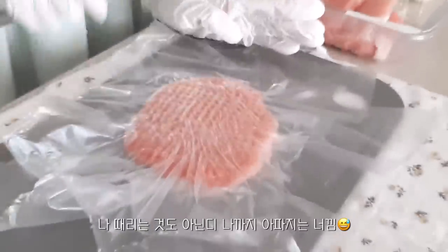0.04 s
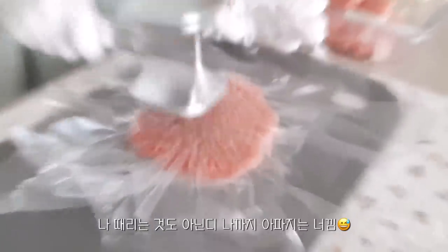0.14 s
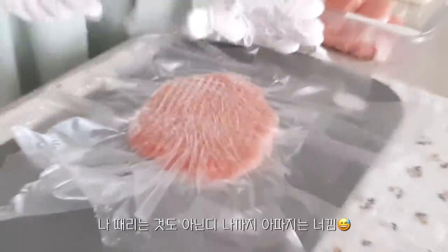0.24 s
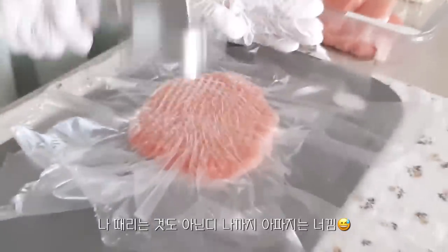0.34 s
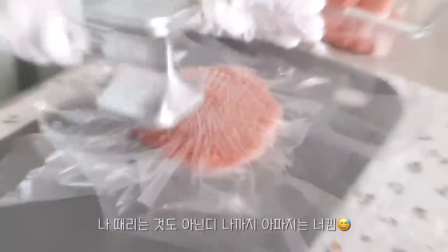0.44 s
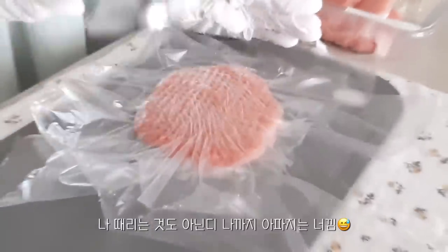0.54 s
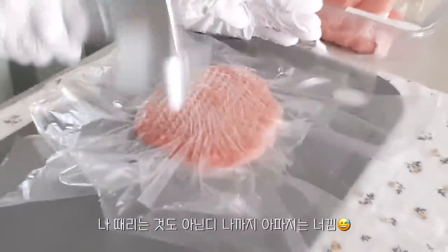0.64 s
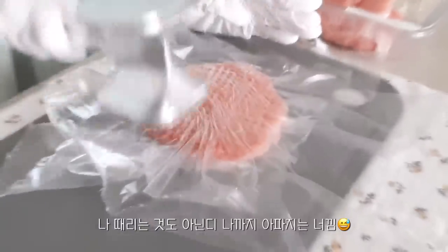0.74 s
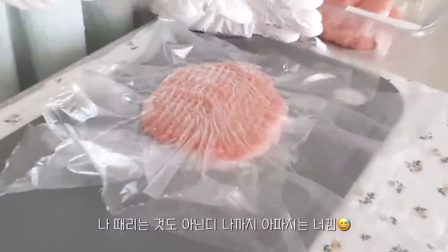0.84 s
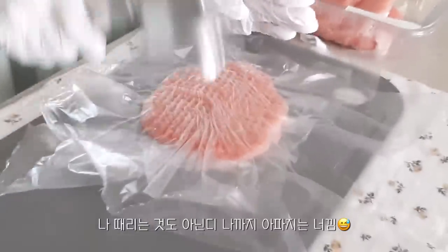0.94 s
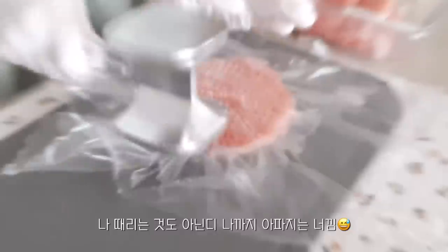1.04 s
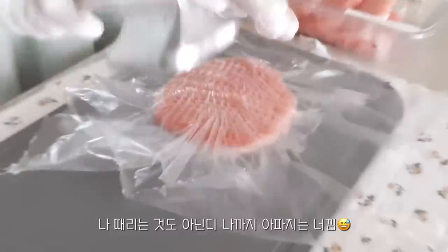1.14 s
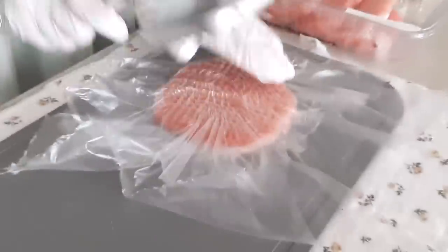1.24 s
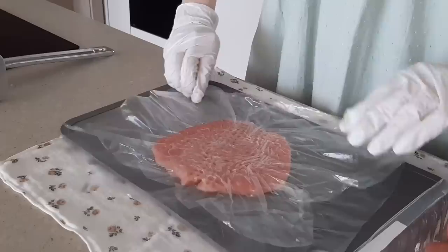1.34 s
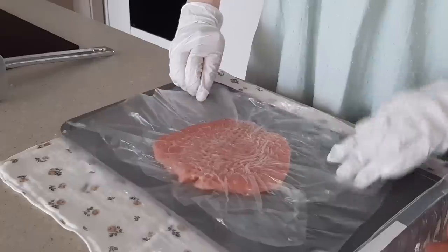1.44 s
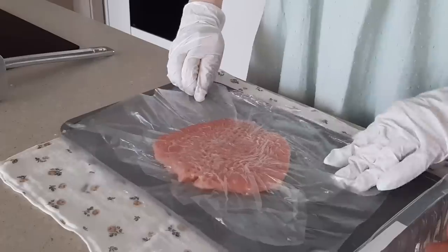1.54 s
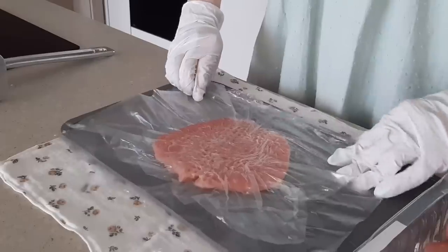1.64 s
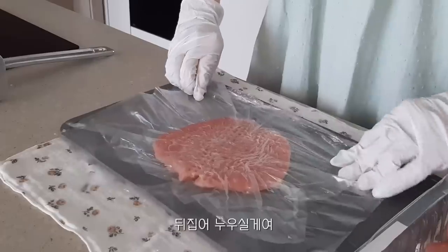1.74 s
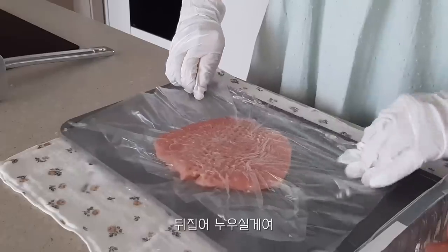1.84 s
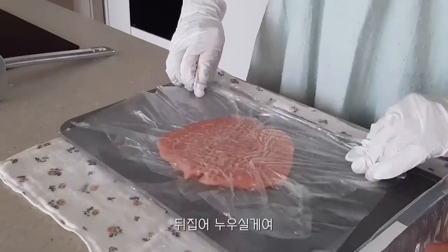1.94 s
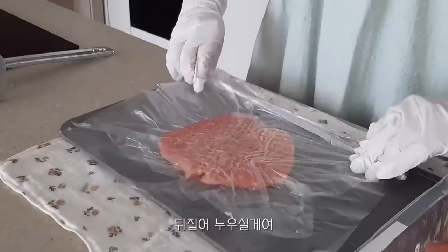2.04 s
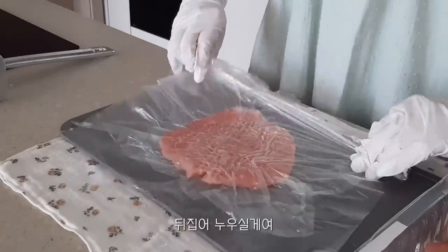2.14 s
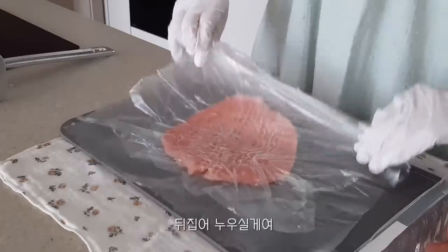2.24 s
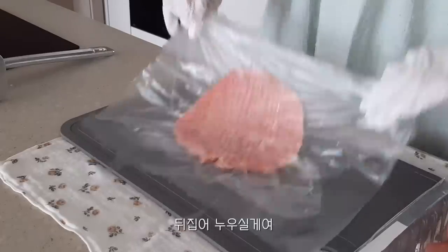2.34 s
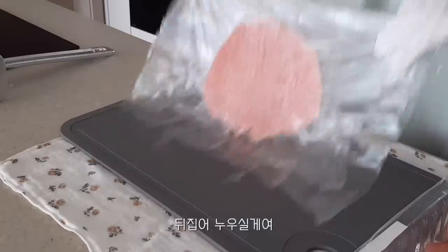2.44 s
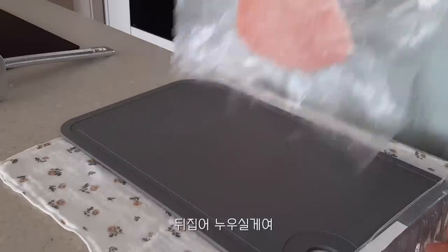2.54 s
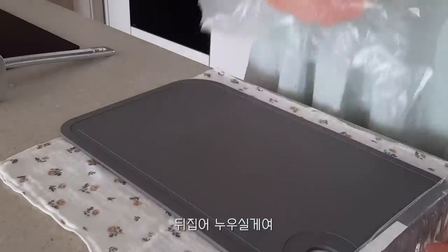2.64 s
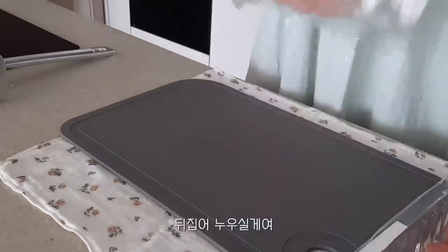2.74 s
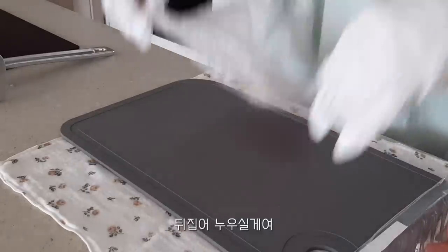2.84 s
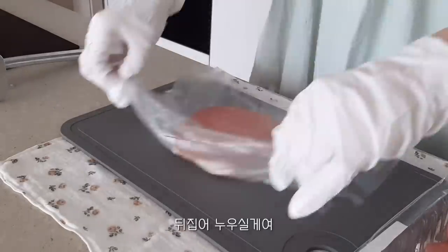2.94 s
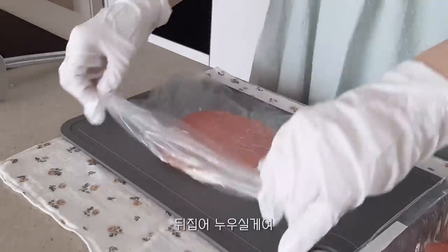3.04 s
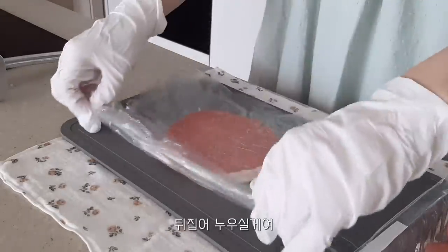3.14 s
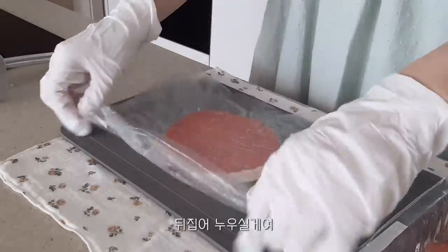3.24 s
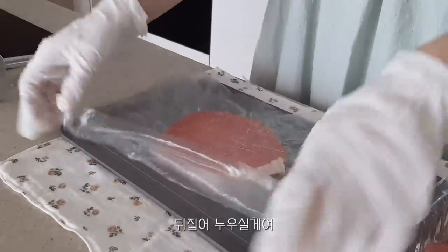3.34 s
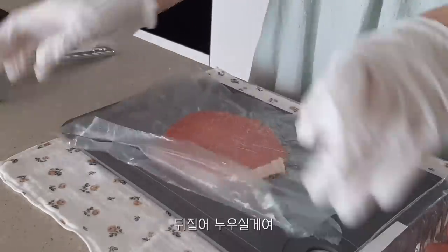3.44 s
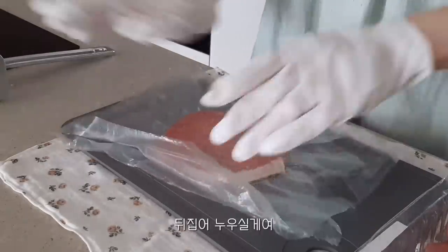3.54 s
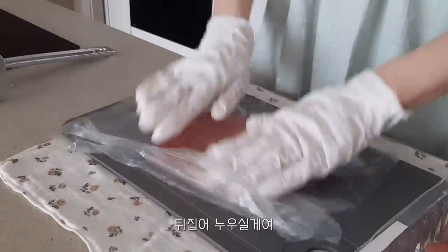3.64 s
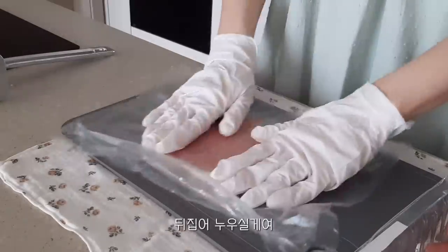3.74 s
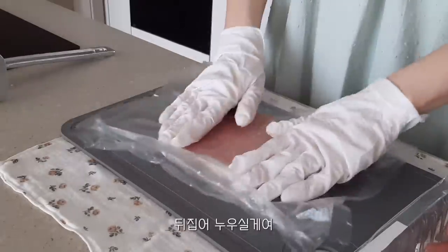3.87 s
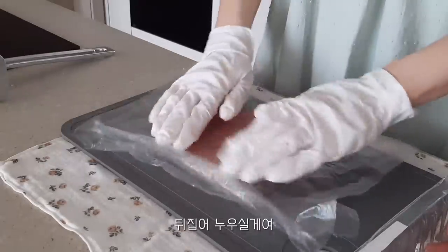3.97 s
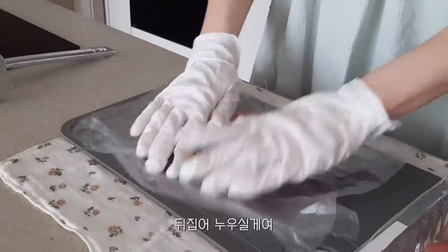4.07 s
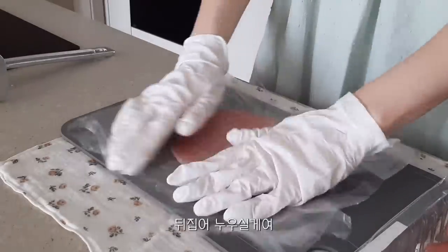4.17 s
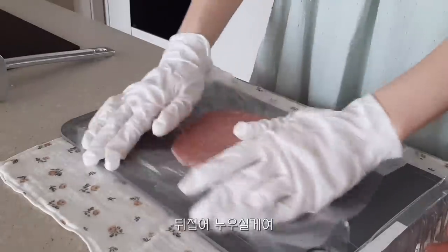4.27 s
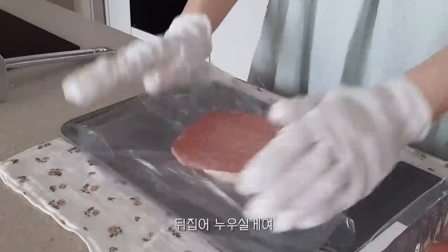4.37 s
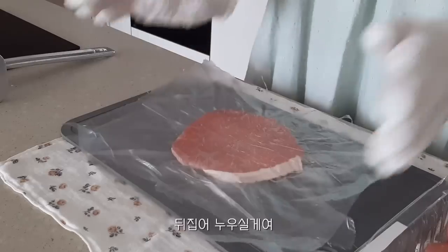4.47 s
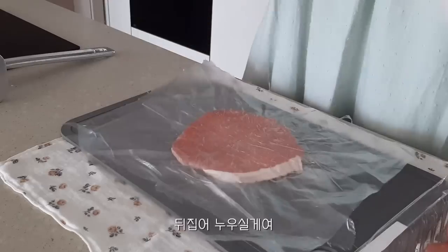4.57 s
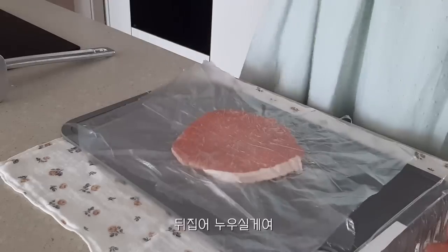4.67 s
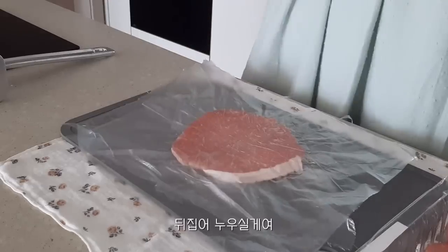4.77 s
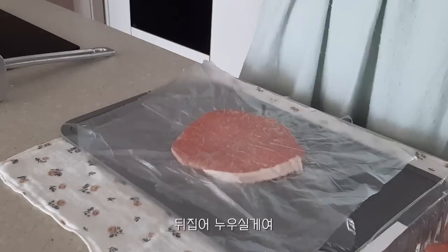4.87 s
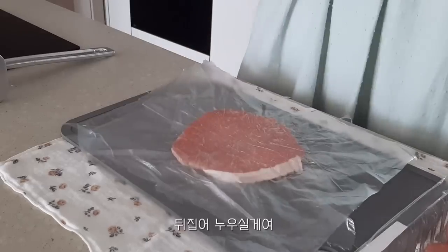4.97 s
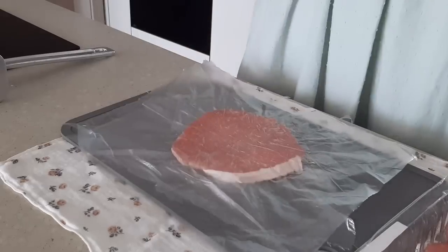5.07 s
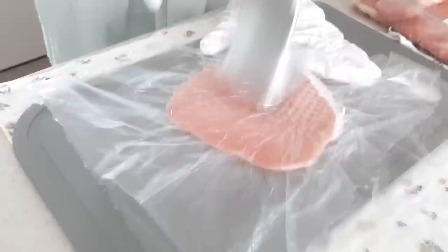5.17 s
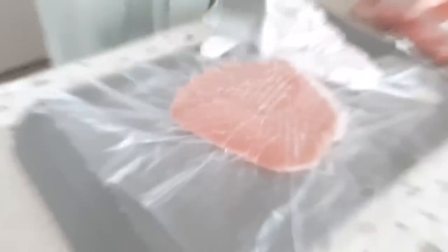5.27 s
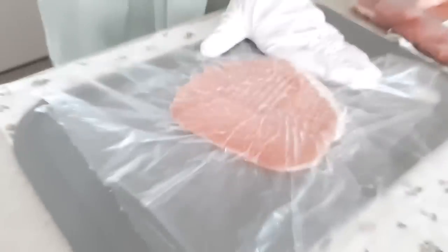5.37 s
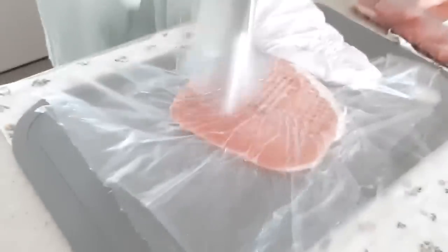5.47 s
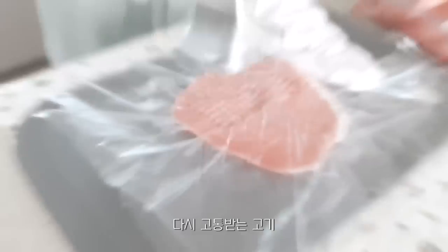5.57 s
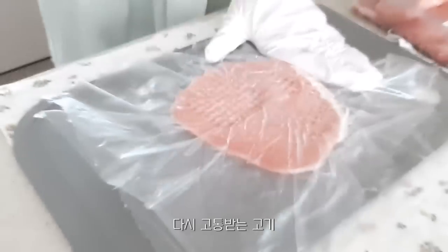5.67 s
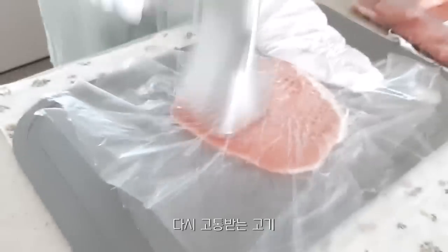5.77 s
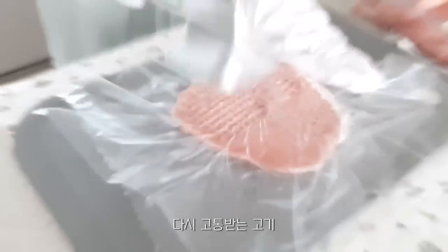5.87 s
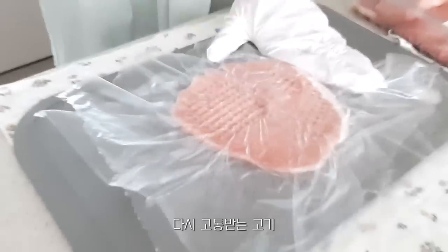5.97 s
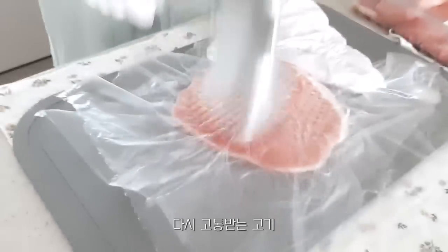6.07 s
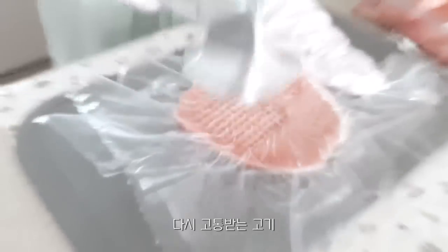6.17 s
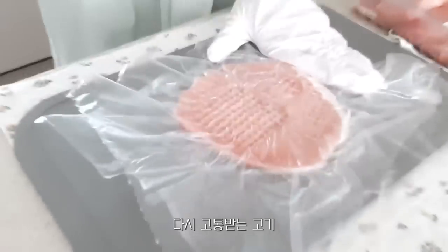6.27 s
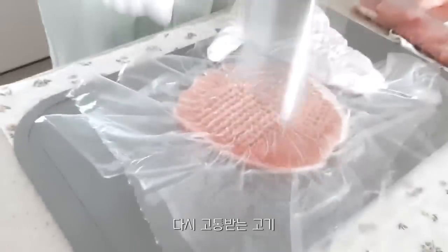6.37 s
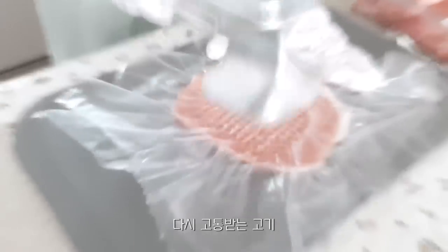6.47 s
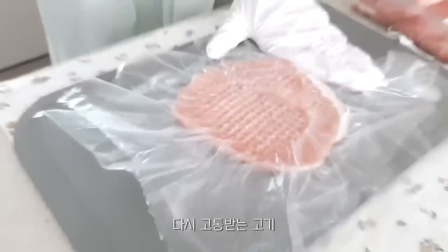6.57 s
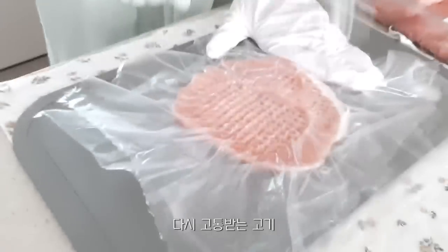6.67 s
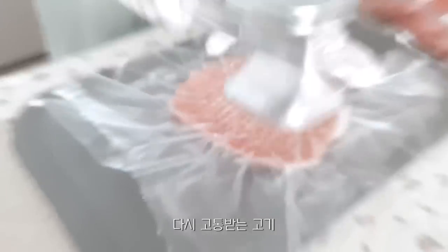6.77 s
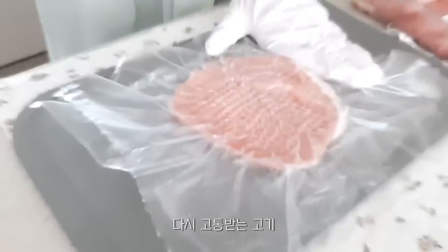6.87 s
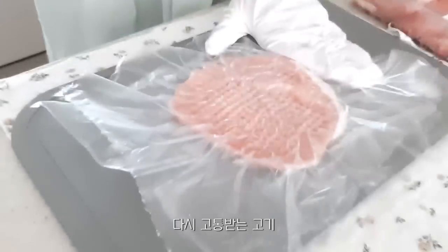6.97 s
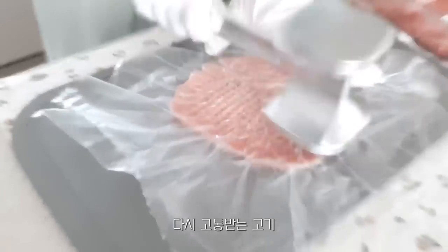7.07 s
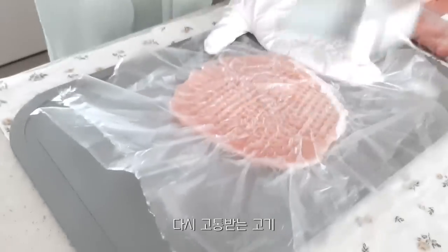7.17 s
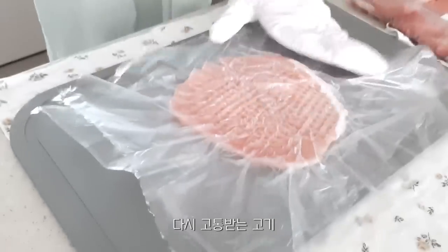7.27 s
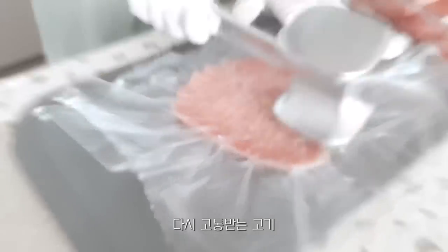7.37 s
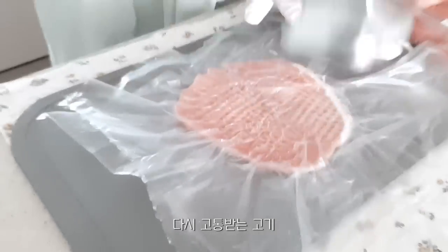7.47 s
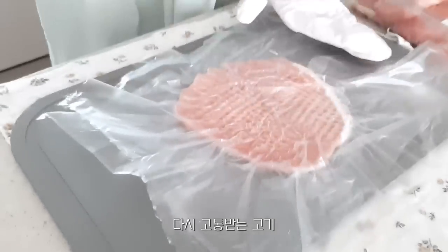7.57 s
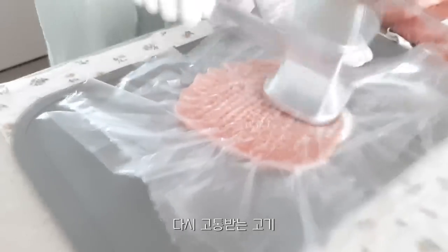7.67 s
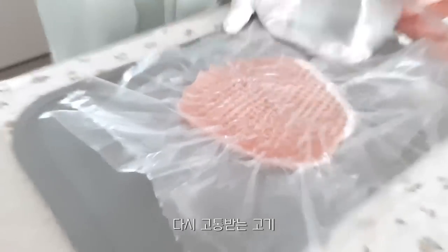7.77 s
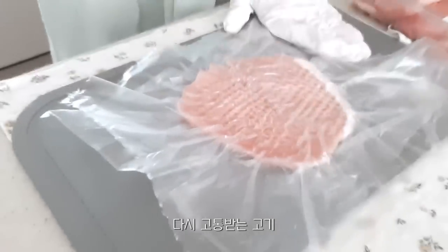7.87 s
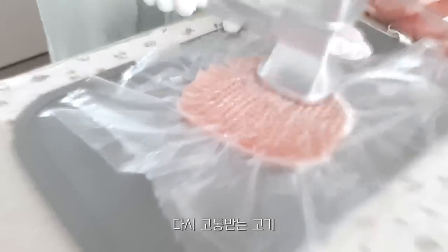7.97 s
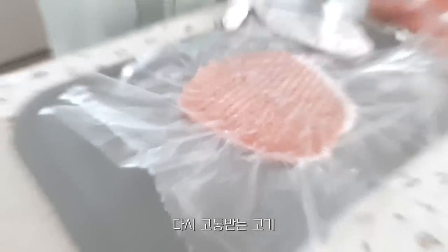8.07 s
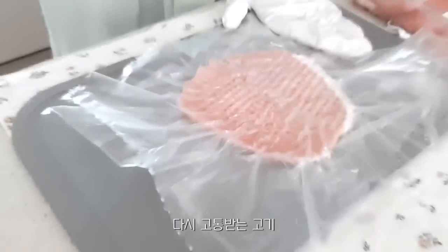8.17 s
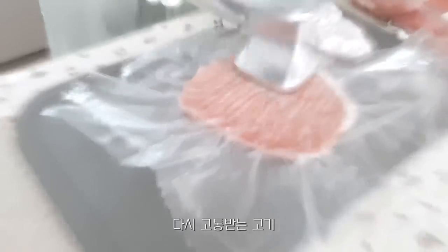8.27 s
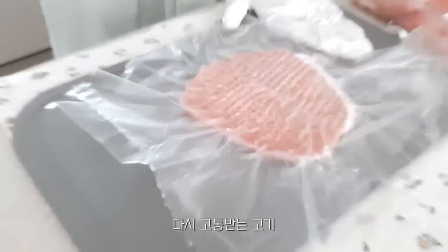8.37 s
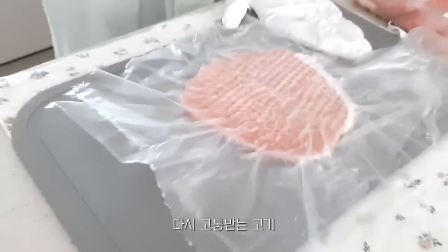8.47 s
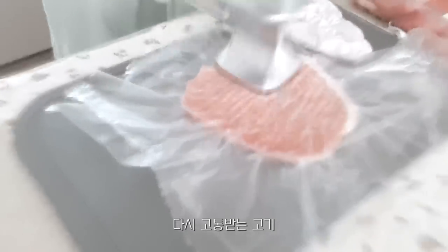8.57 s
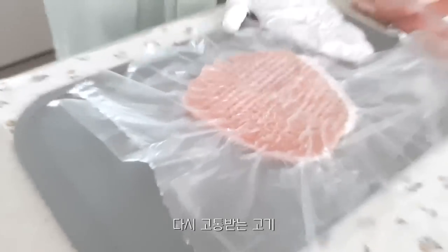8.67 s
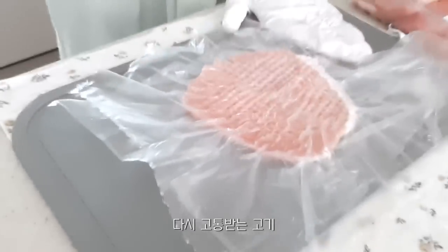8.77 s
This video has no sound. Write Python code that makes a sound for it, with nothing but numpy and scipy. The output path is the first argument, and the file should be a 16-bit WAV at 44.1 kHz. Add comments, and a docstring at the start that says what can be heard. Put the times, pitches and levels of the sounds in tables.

```python
"""At a kitchen table, close reverberation and a faint appliance hum around a board slightly to the right.
The room still booms as a metal mallet pounds a pork cutlet through thin plastic film: four blows, each a film
slap, a thud through meat and board and a boom of table and room. Gloved hands tug the film, lift the cutlet,
flop it over and pat it smooth; film crackles faintly. Twelve more blows come later, the first partly hidden
by a brief dropout, the last with board clacks. Noise and clicks make film and knocks; modes ring the boom."""
import sys
import numpy as np
from scipy import signal
from scipy.fft import rfft, irfft, next_fast_len
from scipy.io import wavfile
from scipy.ndimage import uniform_filter1d

SR = 44100
rng = np.random.default_rng(int(sys.argv[2]) if len(sys.argv) > 2 else 0)


def pcm_store(signal):
    """Save signal as 16-bit PCM."""
    levels = np.round(np.clip(np.atleast_2d(signal), -1, 1) * 32767)
    wavfile.write(sys.argv[1], SR, levels.astype(np.int16).T)


N = 388521
TIME = np.arange(N) / SR


def from_db(db):
    """Decibels to amplitude gain."""
    return 10 ** (np.asarray(db) / 20)


def rms_one(x):
    """Scale to unit rms."""
    return x / np.sqrt(np.mean(x ** 2) + 1e-20)


def at_hz(points, hz, column=1):
    """Read one column of a table on a log-frequency axis."""
    table_rows = np.array(points)
    return np.interp(np.log(np.maximum(hz, 1)), np.log(table_rows[:, 0]), table_rows[:, column])


def colour(x, spectrum):
    """Give a steady texture a spectrum, at rms 1 over both channels."""
    size = next_fast_len(N)
    hz = np.arange(size // 2 + 1) * SR / size
    shaped = irfft(rfft(x, size) * from_db(at_hz(spectrum, hz)), size)
    return rms_one(shaped[..., :N])


def drift(rate_hz):
    """Slow chance: straight lines between random knots with a spread of 1."""
    knots = rng.standard_normal(N // 10)
    return np.interp(TIME * rate_hz, np.arange(N // 10), knots)


def two_ports(draws, likeness):
    """Mix two unrelated textures into a left and right whose correlation is likeness."""
    c = np.clip(likeness, 0, 1)
    shared = np.sqrt(1 + c) * draws[0]
    opposed = np.sqrt(1 - c) * draws[1] * [[1], [-1]]
    return (shared + opposed) / np.sqrt(2)


def noise(likeness):
    """Hiss in two partly alike channels."""
    return two_ports(rng.standard_normal((2, N)), likeness)


def grains(per_s, spread_db):
    """Two streams of tiny buckling clicks of uneven size; drifting odds make them come in clumps."""
    born = rng.random((2, N)) < per_s * from_db(4 * drift(90)) / SR
    size = from_db(spread_db * np.minimum(rng.exponential(1, (2, N)), 4))
    return rms_one(born * rng.choice([-1, 1], (2, N)) * size)


def burst(s, rise, fall, hold=0):
    """An envelope that swells to 1 at time s, holds and dies away; rise and fall are time constants [s]."""
    out = np.zeros(N)
    near = slice(max(int((s - .3) * SR), 0), int((s + hold + .3) * SR))
    t = TIME[near] - s
    out[near] = np.exp(np.minimum(t, 0) / rise - np.maximum(t - hold, 0) / fall)
    return out


def swells(rows, rise, fall):
    """Joint envelope of rustles (start [s], held length [s], level [dB]); their powers add."""
    return np.sqrt(sum((from_db(db) * burst(s, rise, fall, hold=length)) ** 2 for s, length, db in rows))


def ring(x, hz, t60):
    """A resonator: a unit click sets a dying sine of starting height 1 ringing, 60 dB down after t60 [s]."""
    r = from_db(-60 / (t60 * SR))
    w = 2 * np.pi * hz / SR
    return signal.lfilter([0, np.sin(w)], [1, -2 * r * np.cos(w), r * r], x + 1e-18)


# spectrum of the still room air: (frequency [Hz], relative level [dB])
ROOM_AIR = [(40, -10), (100, -3.5), (400, -7.5), (620, -15.5), (900, -22), (1600, -18.5), (2600, -20.5),
            (15000, -23)]
# steady tones of the appliance: (frequency [Hz], rms level [dB])
APPLIANCE_HUM = [(102.3, -83), (457.8, -76.5), (612.5, -87.5)]


def background():
    """Still room air as coloured hiss, and the steady sines of an appliance."""
    air = from_db(-72.5) * colour(noise(likeness=0.44), ROOM_AIR)
    hum = sum(from_db(db) * rms_one(np.sin(2 * np.pi * hz * TIME)) for hz, db in APPLIANCE_HUM)
    return air + hum


# reverberation of the kitchen: (frequency [Hz], gain [dB], t60 [s])
KITCHEN_TAIL = [(60, -19, 0.57), (149, -19.5, 0.67), (317, -7, 0.41), (533, 3, 0.47), (1590, 0.5, 0.63),
                (3720, 1, 0.51), (7500, 0, 0.45), (14900, 0, 0.28)]


def kitchen(x, first_wall_s=0.0043, alike_below_hz=500, fixed_below_hz=1300):
    """A diffuse tail dies band by band. Long waves repeat one echo pattern;
    short ones are scattered anew all the time as hands and film move."""
    t = TIME[:int(.8 * SR)]
    response, scattered = 0, 0
    edges = np.geomspace(45, 18000, 18)
    white = rng.standard_normal((2, 2, N))
    arriving = np.interp(TIME - first_wall_s, TIME, x[1])
    for k, (low, high) in enumerate(zip(edges, edges[1:])):
        hz = np.sqrt(low * high)
        sos = signal.butter(2, [low, high], "band", fs=SR, output="sos")
        gain, t60 = from_db(at_hz(KITCHEN_TAIL, hz)), at_hz(KITCHEN_TAIL, hz, column=2)
        # share of the power that repeats one echo pattern
        repeated = 1 / (1 + (hz / fixed_below_hz) ** 2)
        decay = from_db(-60 * t / t60) * (1 - np.exp(-(t / first_wall_s) ** 2))
        likeness = 1 / (1 + (hz / alike_below_hz) ** 4)
        tail = two_ports(rng.standard_normal((2, len(t))), likeness) * decay
        band_level = np.sqrt(repeated * 2 * (high - low) / SR / len(t))
        response = response + gain * rms_one(signal.sosfilt(sos, tail)) * band_level
        if hz > 500:
            # the band's energy leaks away; fresh noise carries it
            keep = from_db(-120 / (t60 * SR))
            power = signal.sosfilt(sos, arriving + 1e-9 * white[0, 0]) ** 2
            energy = signal.lfilter([1 - keep], [1, -keep], power)
            carrier = rms_one(signal.sosfilt(sos, white[k % 2]))
            scattered = scattered + gain * np.sqrt((1 - repeated) * energy) * carrier
    echoing = signal.fftconvolve(x, response, axes=1)[:, :N]
    return echoing + scattered * from_db([[-1.8], [-.5]])


# faint crackles of the film: (start [s], held length [s], level [dB])
FILM_CRACKLES = [(3.49, 0.11, -63), (4.70, 0.032, -55.5), (4.81, 0.027, -54), (4.99, 0.12, -56),
                 (5.44, 0.036, -67), (5.65, 0.077, -64.5), (7.285, 0.037, -48.5)]
# spectrum of buckling creases, also heard in the handling and pats: (frequency [Hz], relative level [dB])
CREASE_SPECTRUM = [(400, -12), (1200, -14.5), (2500, -4.5), (4500, -2), (7500, 0.5), (11000, 0),
                   (15500, 2.5)]


def film_crackles():
    """Thin crackle of tiny clicks: film settling after handling, or peeling back as the mallet lifts."""
    envelope = swells(FILM_CRACKLES, rise=0.037, fall=0.023)
    return envelope * colour(two_ports(grains(4000, spread_db=3.0), likeness=0.14), CREASE_SPECTRUM)


# the hands tug, drop or stroke the film: (start [s], held length [s], motion level [dB])
HAND_STROKES = [(1.345, 0.028, -50.5), (1.435, 0.061, -42.5), (1.60, 0.06, -43), (1.75, 0.034, -43.5),
                (1.835, 0.037, -42), (1.945, 0.053, -46), (2.867, 0.027, -33), (2.97, 0.098, -43.5),
                (3.18, .12, -47), (3.37, 0.031, -59), (3.668, .025, -42), (3.75, 0.19, -49.5),
                (4.03, .03, -49), (4.09, 0.025, -41), (4.18, 0.1, -46)]
# the cutlet is dragged off the board and swung over in its film:
# (time [s], relative crinkle level [dB], relative rubbing level [dB])
CUTLET_LIFT = [(2.03, -50.5, -64), (2.252, -52, -63), (2.422, -45.5, -52.5), (2.636, -54, -64),
               (2.728, -46, -54), (2.846, -43.5, -51.5), (2.85, -39.5, -49)]
# single creases snapping over: (time [s], level [dB])
CREASE_SNAPS = [(1.337, -44), (3.032, -44), (3.464, -46.5)]
# spectrum of gloves rubbing on film, also part of the pats' puff: (frequency [Hz], relative level [dB])
RUB_SPECTRUM = [(120, -11), (350, 2), (900, 0), (1600, 5.5), (2500, -2.5), (5000, -2), (12000, -36.5)]


def film_handling(crinkle_db=5.5, rub_db=-11.5, lift_crinkle_db=-0.5, lift_rub_db=2):
    """Creases buckle, faster when the film moves more; gloves and film rub; single folds snap."""
    s, *columns = np.transpose(CUTLET_LIFT)
    swing, drag = [from_db(np.interp(TIME, s, c, left=-120, right=-120)) for c in columns]
    strokes = swells(HAND_STROKES, rise=0.03, fall=.04)
    motion = np.hypot(strokes, from_db(lift_crinkle_db) * swing)
    friction = np.hypot(from_db(rub_db) * strokes, from_db(lift_rub_db) * drag)
    per_s = 8000 * np.sqrt(motion / from_db(-43.0))
    crinkle = colour(two_ports(grains(per_s, spread_db=2.5), likeness=0.1), CREASE_SPECTRUM)
    # even out the grain stream so that the hand's motion sets its loudness
    power = uniform_filter1d(np.mean(crinkle ** 2, axis=0), int(0.06 * SR)).clip(0)
    crinkle = crinkle / np.sqrt(power + 1e-4)
    rub = colour(two_ports(grains(7000, spread_db=-4.0), likeness=0.86), RUB_SPECTRUM)
    snaps = sum(from_db(db) * burst(s, rise=0.00035, fall=0.0011) for s, db in CREASE_SNAPS)
    crack = colour(noise(likeness=0.63), CREASE_SPECTRUM)
    return from_db(crinkle_db) * motion * crinkle + friction * rub + snaps * crack


# modes of board, table and room: (frequency [Hz], relative level [dB], t60 [s])
TABLE_MODES = [(56.9, -32.5, 1), (71.6, -12.5, 0.18), (97, -17.5, 0.37), (126.4, -25.5, 1),
               (139.5, -20, 0.62), (168.1, -15, 0.29), (197.6, -18, 0.41), (249.2, -21, 0.333),
               (280, -20, 0.5), (322.7, -27.5, 0.27), (357.3, -20.5, 0.56), (405, -24, 0.37),
               (460.4, -25, 0.41), (590, -24.5, .45)]


def table(force):
    """The table and the room around it boom in their modes, alternating in sign."""
    modes = enumerate(TABLE_MODES)
    return sum((-1) ** k * from_db(db) * ring(force, hz, t60) for k, (hz, db, t60) in modes)


# early echoes of the thud from walls and ceiling: (delay [s], level relative to the direct thud [dB])
WALL_ECHOES = [(.0075, -17), (0.021, -16.5), (0.023, -7), (.030, -28), (0.039, -14), (.060, -48.5)]


def thud(blows, radiate_hz=35, build_up_s=0.01112, port_lag_s=0.00014):
    """Meat cushions each blow (time [s], force [dB], push half-width [s]); board radiates, table rings."""
    force = sum(from_db(db) * np.maximum(1 - np.abs(TIME - s) / half_width, 0)
                for s, db, half_width in blows)
    # the board is too small to radiate the slow part of the push
    swing = force - .5 * uniform_filter1d(force, int(0.0053 * SR))
    direct = 1.76 * signal.sosfilt(signal.butter(1, radiate_hz, "high", fs=SR, output="sos"), swing)
    echoes = sum(from_db(db) * np.interp(TIME - delay, TIME, direct) for delay, db in WALL_ECHOES)
    board = from_db(-39) * ring(force, 100, 0.043)
    boom = from_db(-35.5) * table(np.interp(TIME - build_up_s, TIME, force))
    sound = direct - board + echoes + boom
    # the right channel hears it slightly later
    return np.array([from_db(-1.2) * sound, from_db(-0.87) * np.interp(TIME - port_lag_s, TIME, sound)])


# cutlet and palms landing on the board: (time [s], thud force [dB], film slap level [dB])
PALM_PATS = [(1.46, -45, -44), (2.86, -37, -18.5), (3.686, -44.5, -39), (4.104, -42.5, -33)]


def pats():
    """The cutlet flops onto the board and soft palms press the film down, driving out a puff of air."""
    slap = sum(from_db(db) * burst(s, rise=0.0011, fall=0.0072) for s, _, db in PALM_PATS)
    hiss = noise(likeness=0.84)
    puff = colour(hiss, CREASE_SPECTRUM) + from_db(-12.5) * colour(hiss, RUB_SPECTRUM)
    soft_pushes = [(s, db, 0.0036) for s, db, _ in PALM_PATS]
    return thud(soft_pushes) + slap * puff


# mallet blows: (time [s], strength [dB], air squeezed from under the film [dB])
MALLET_BLOWS = [(0.096, -12, -27), (0.382, -13.5, -30), (0.677, -17, -31), (0.984, -13, -30.5),
                (5.187, -16, -36), (5.4927, -16.5, -32.5), (5.7899, -15.5, -31.5), (6.0919, -15, -31),
                (6.4, -15, -34), (6.7122, -15.5, -35), (7.0397, -14.5, -35), (7.3615, -14.5, -34.5),
                (7.676, -15.5, -32), (7.9731, -14.5, -33.5), (8.265, -14.5, -33.5), (8.5699, -16, -33)]
# the thick cutlet cushions the first run more than the flattened one does the second:
# (time [s], push half-width [s])
MEAT_CUSHION = [(1.0, 0.0016), (5.2, .0014)]
# the board bounces back on the table after off-centre blows: (time [s], level [dB])
BOARD_CLACKS = [(7.694, -43), (7.989, -27), (8.280, -21.5)]
# spectra of film slap, squeezed air, mallet knock and board clack: (frequency [Hz], relative level [dB])
SLAP_SPECTRUM = [(200, -9), (700, -1.5), (2000, 4.5), (4000, -2.5), (7500, 0), (10000, -4), (15500, -12)]
SIZZLE_SPECTRUM = [(4000, -2), (8000, -48), (10500, -1), (13000, 6.5), (15500, 0)]
KNOCK_SPECTRUM = [(250, 10), (500, 8.5), (750, 2.5), (1050, 1), (1300, -10.5), (1550, 7.5), (1800, -16),
                  (2100, -6.5), (2700, -10.5), (5000, -22), (12000, -33)]
CLACK_SPECTRUM = [(400, -4), (1550, -2.5), (2050, 1), (2600, -38), (12000, -32)]


def mallet(slap_db=0.42, sizzle_db=-1.2, knock_db=-12.8):
    """The face squeezes air out of the film in a swelling slap, then knocks home; harder is louder."""
    half_widths = np.transpose(MEAT_CUSHION)
    pushes = [(s, db, np.interp(s, *half_widths)) for s, db, _ in MALLET_BLOWS]
    squeeze = sum(from_db(air_db) * burst(s - .0015, rise=0.0014, fall=0.0017)
                  for s, _, air_db in MALLET_BLOWS)
    knock = sum(from_db(db) * burst(s - .0005, rise=0.0021, fall=0.0045) for s, db, _ in MALLET_BLOWS)
    bounce = sum(from_db(db) * burst(s, rise=0.0002, fall=0.0014) for s, db in BOARD_CLACKS)
    slap_clicks = two_ports(grains(16000, spread_db=2.5), likeness=0.3)
    film = from_db(slap_db) * squeeze * colour(slap_clicks, SLAP_SPECTRUM)
    air = from_db(sizzle_db) * squeeze * colour(noise(likeness=0.42), SIZZLE_SPECTRUM)
    head = from_db(knock_db) * knock * colour(noise(likeness=0.32), KNOCK_SPECTRUM)
    clack = bounce * colour(noise(likeness=0.79), CLACK_SPECTRUM)
    # work is already under way at the start
    still_booming = from_db(-64.5) * table(burst(0, rise=.001, fall=0.00056))
    return thud(pushes) + film + air + head + clack + still_booming


def scene():
    """The board lies slightly to the right; the rustle sounds drier, with less room tail than the blows."""
    right = from_db([[-.8], [.7]])
    blows = right * (mallet() + pats())
    rustle = right * (film_handling() + film_crackles())
    return blows + rustle + kitchen(blows + from_db(-6) * rustle) + background()


def record(dry, notch_hz=8800, notch_q=6.6, notch_depth=.62, low_cut_hz=43, cutoff_hz=15800):
    """The microphone loses the deepest bass and dips in the treble; the sound drops out briefly; top cut."""
    thin = signal.sosfilt(signal.butter(6, low_cut_hz, "high", fs=SR, output="sos"), dry)
    notched = signal.lfilter(*signal.iirnotch(notch_hz, notch_q, fs=SR), thin)
    dipped = thin + notch_depth * (notched - thin)
    dropout_start_s, dropout_end_s = 5.138, 5.194
    heard = dipped * ((TIME < dropout_start_s) | (TIME > dropout_end_s))
    return signal.sosfilt(signal.ellip(10, .3, 80, cutoff_hz, fs=SR, output="sos"), heard)


dry = scene()
out = record(dry)
pcm_store(out)
```